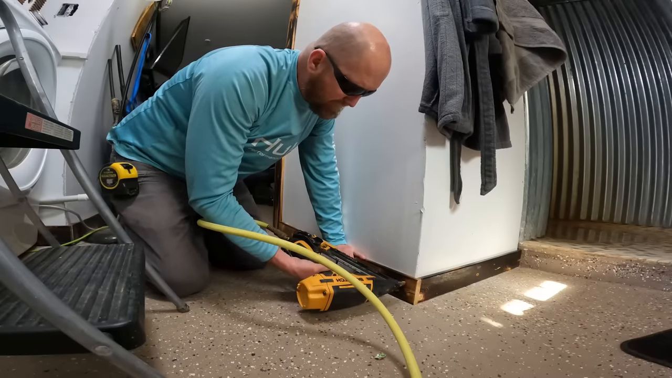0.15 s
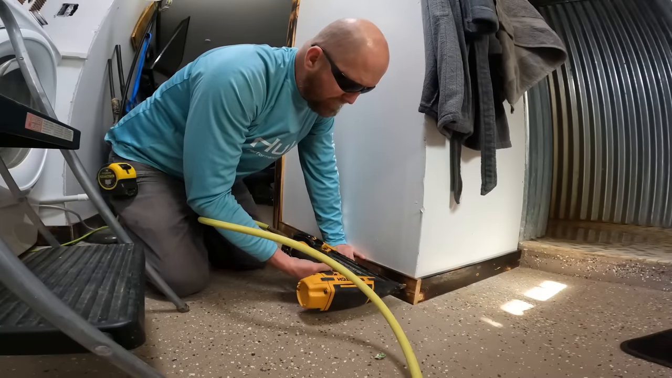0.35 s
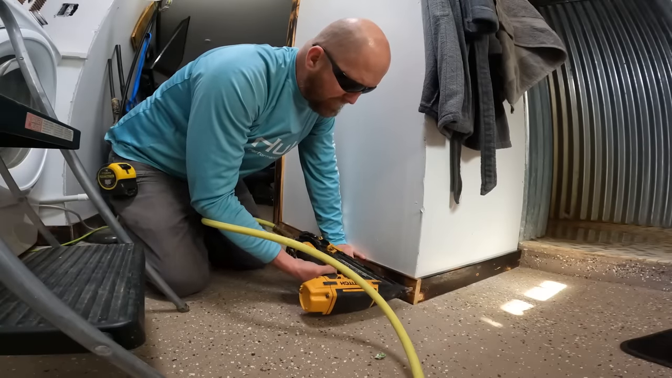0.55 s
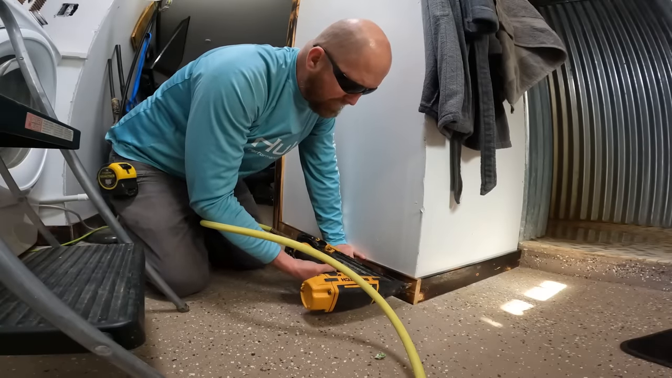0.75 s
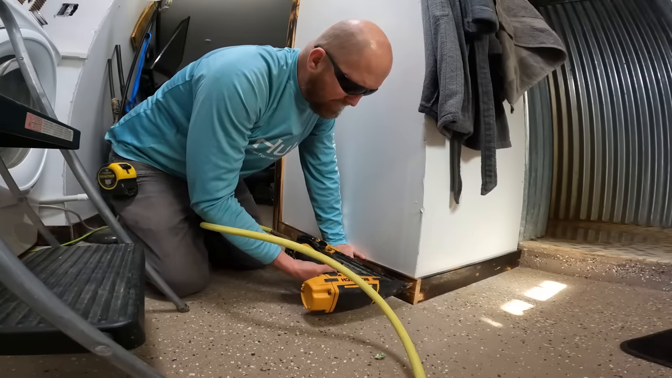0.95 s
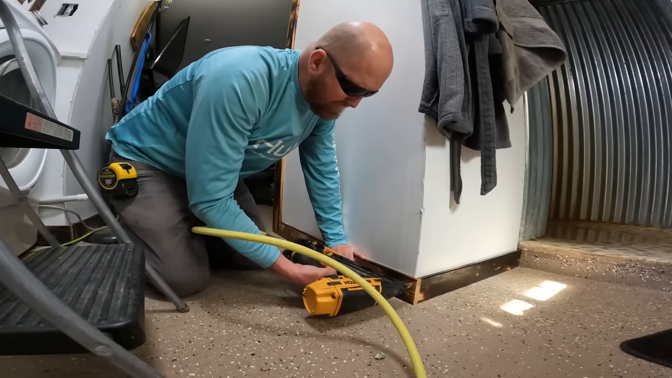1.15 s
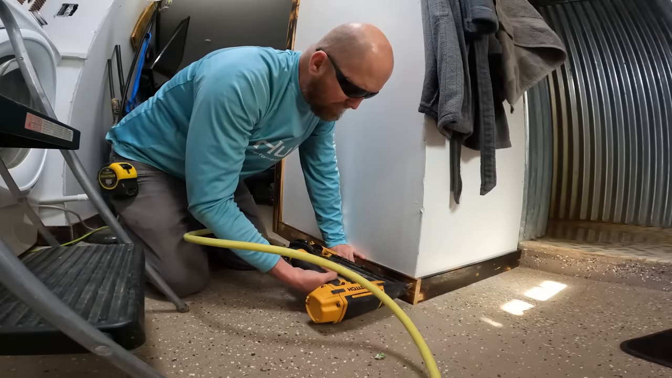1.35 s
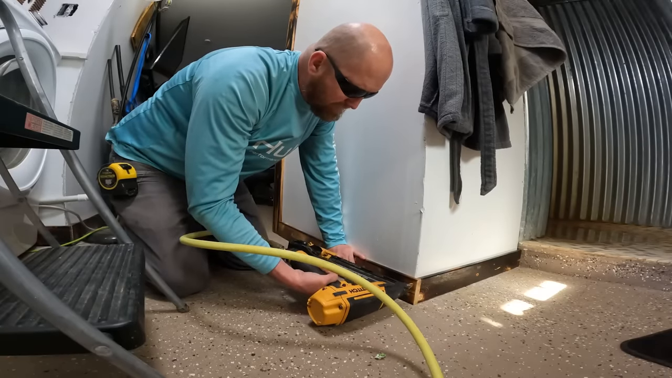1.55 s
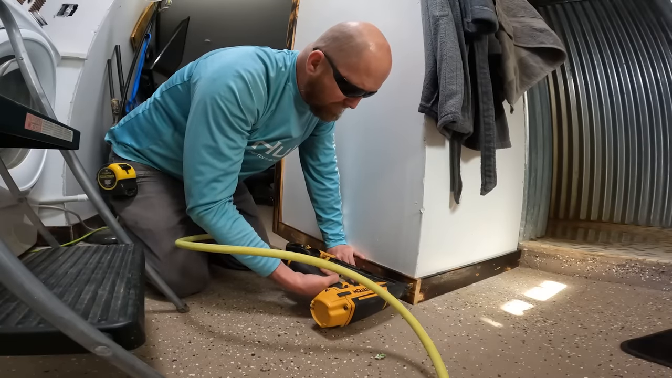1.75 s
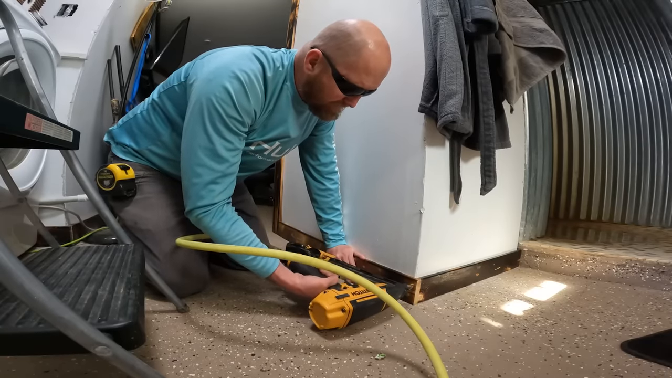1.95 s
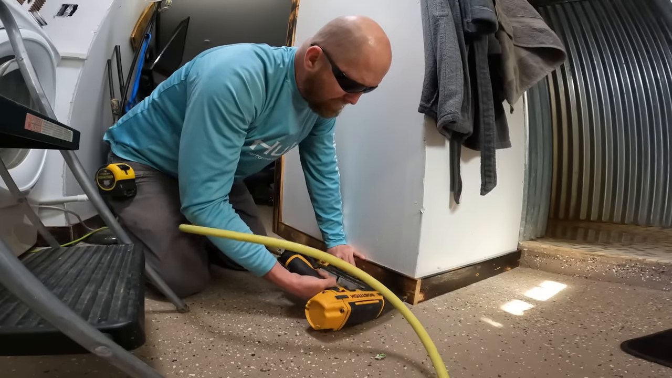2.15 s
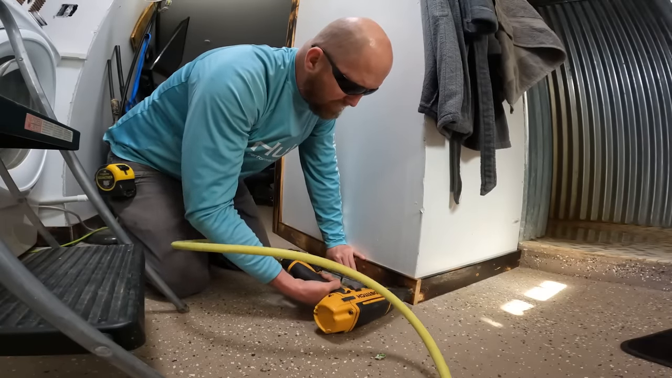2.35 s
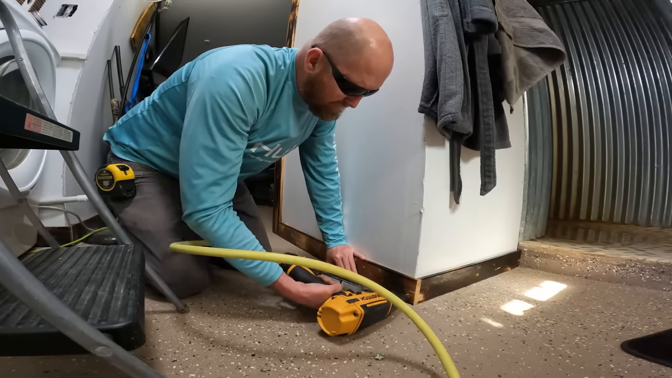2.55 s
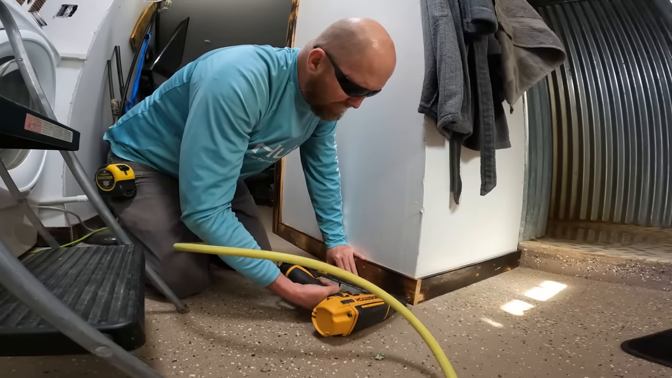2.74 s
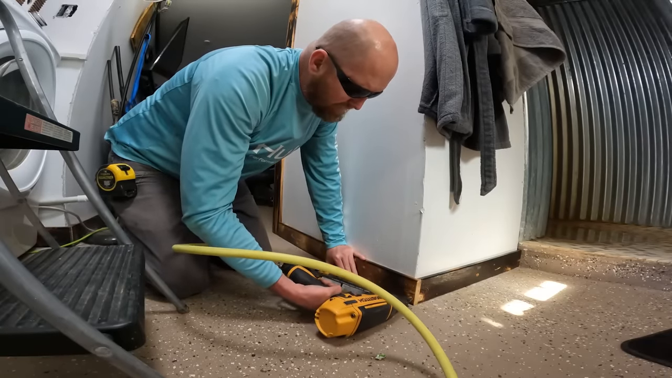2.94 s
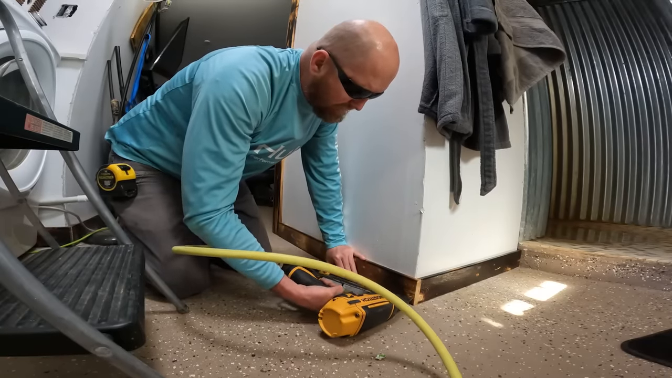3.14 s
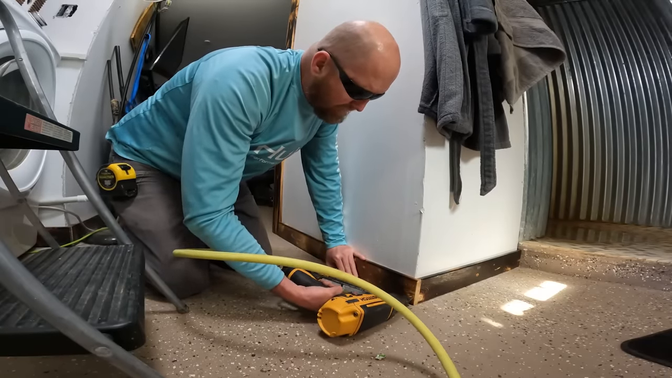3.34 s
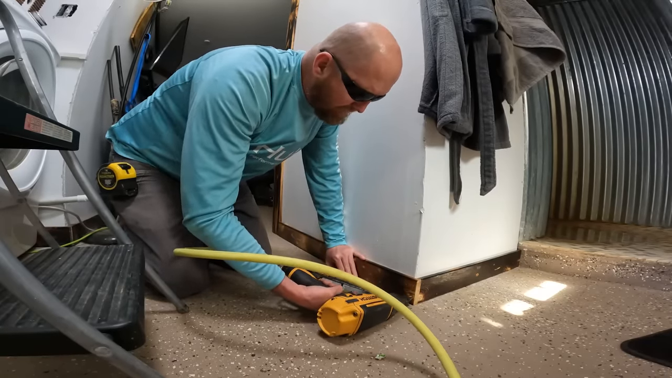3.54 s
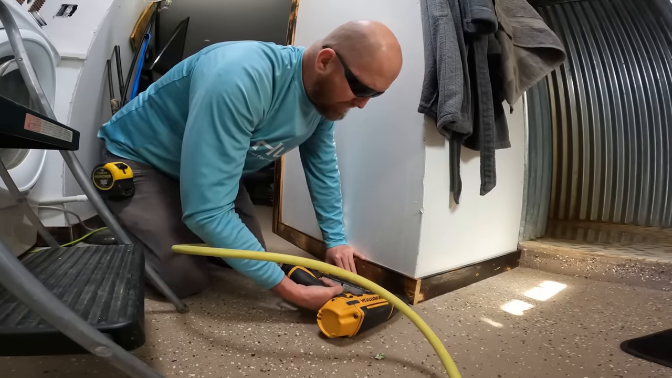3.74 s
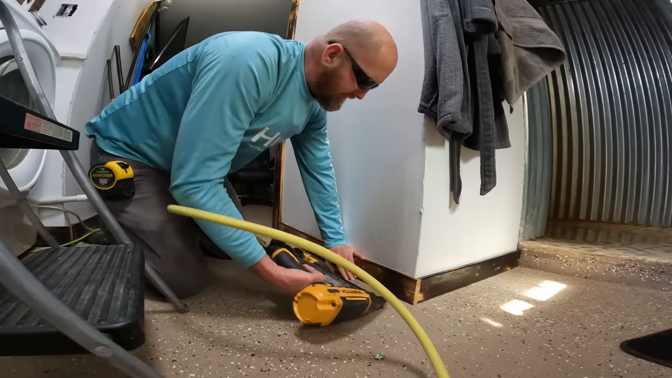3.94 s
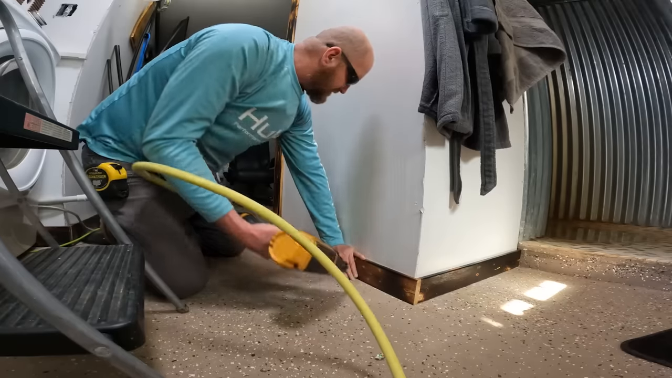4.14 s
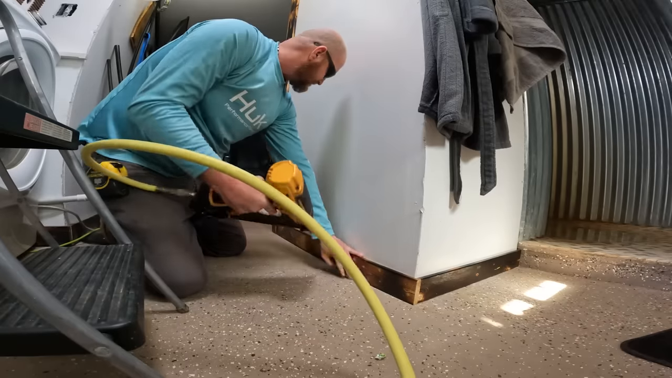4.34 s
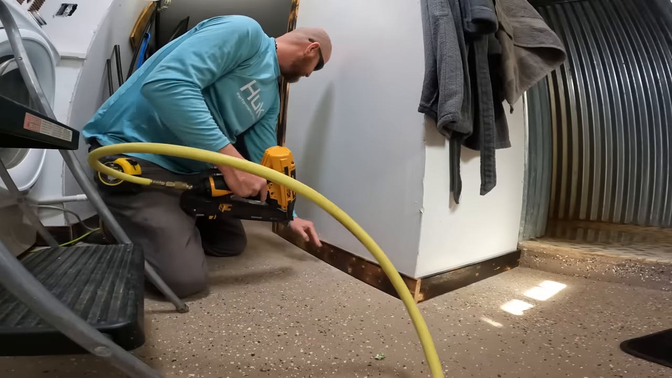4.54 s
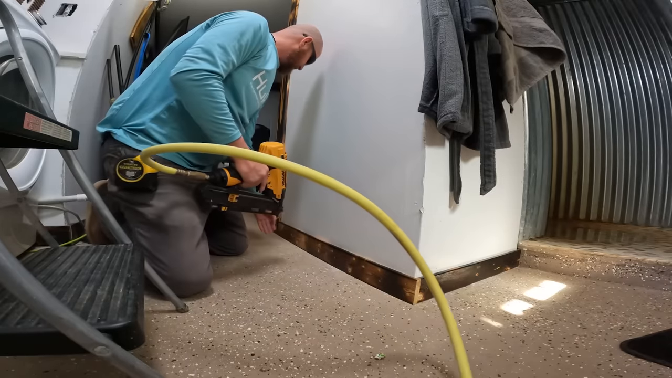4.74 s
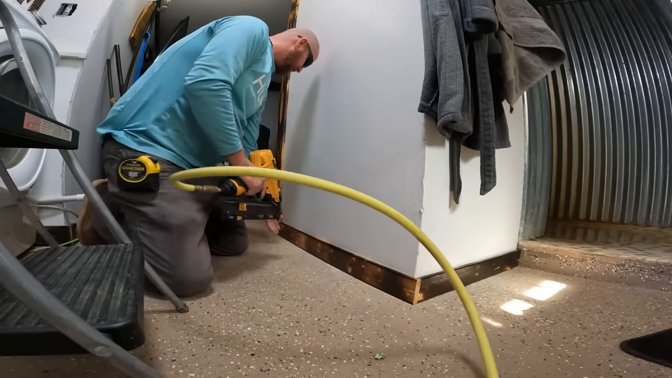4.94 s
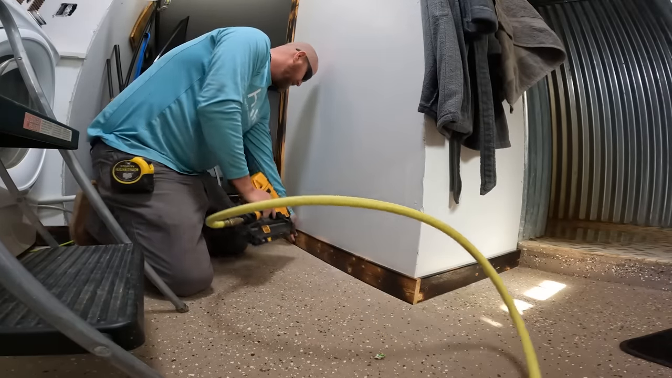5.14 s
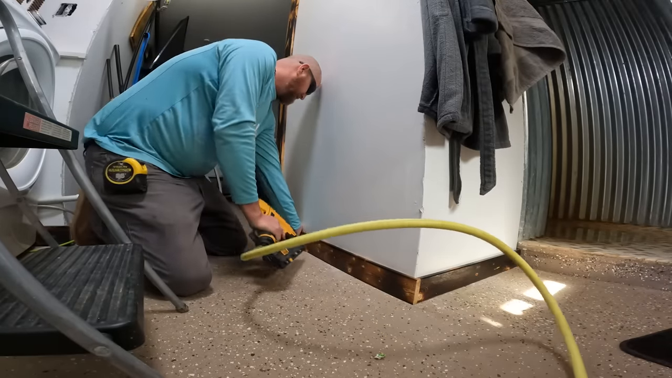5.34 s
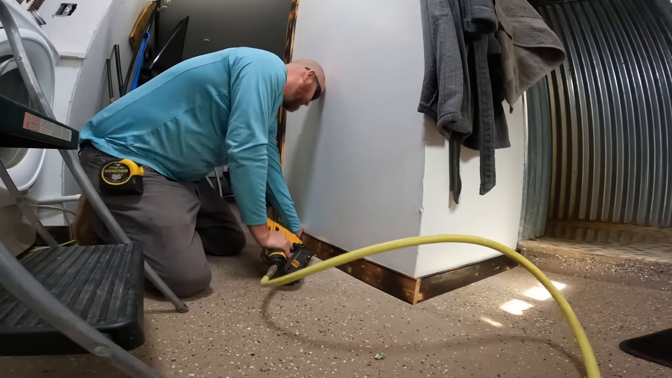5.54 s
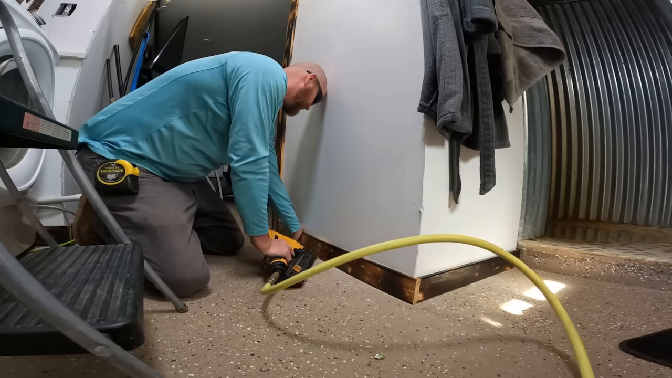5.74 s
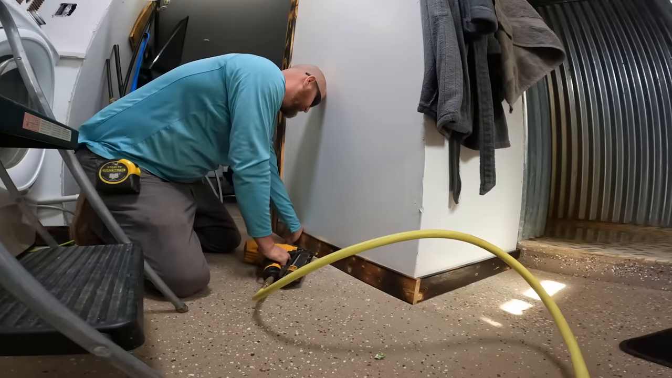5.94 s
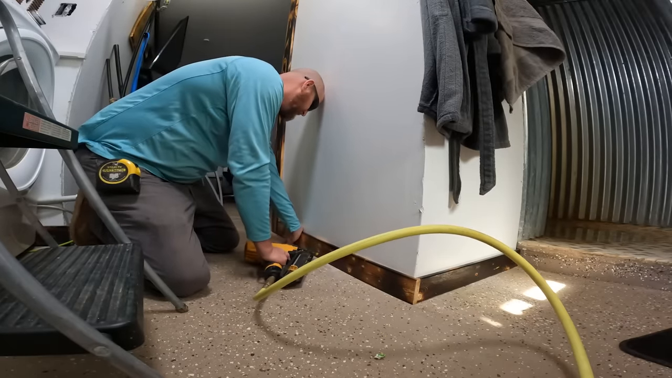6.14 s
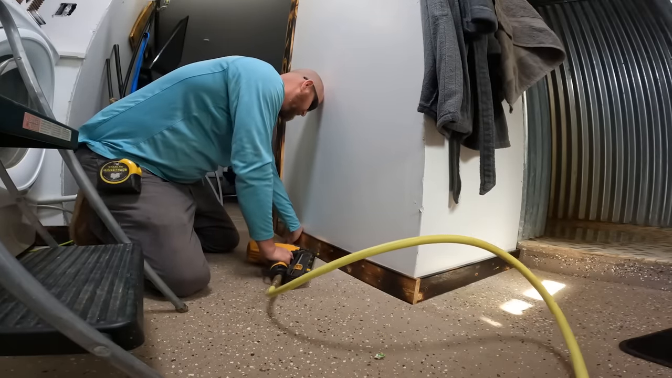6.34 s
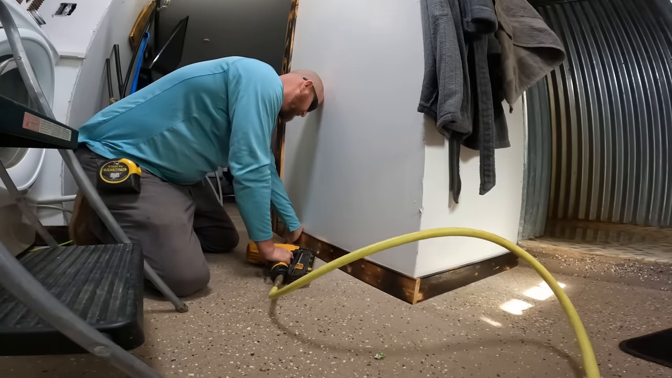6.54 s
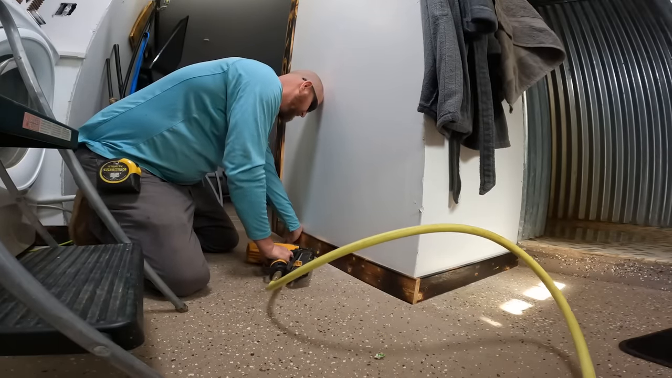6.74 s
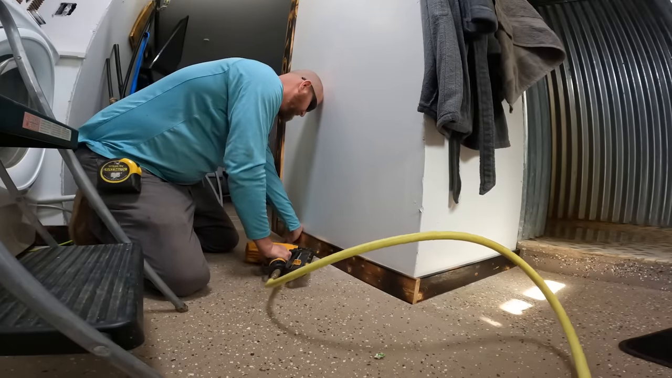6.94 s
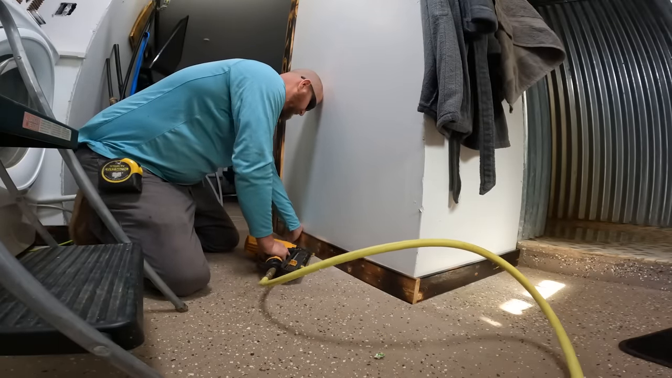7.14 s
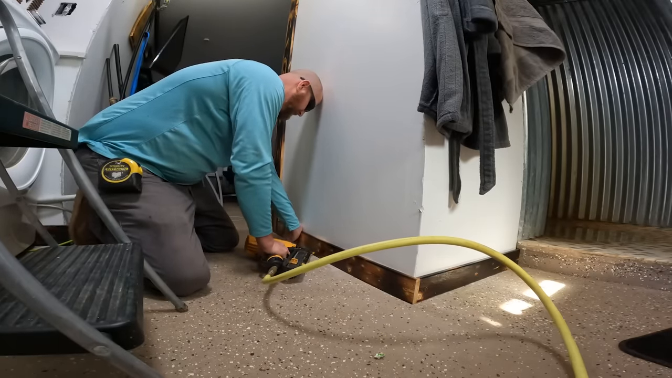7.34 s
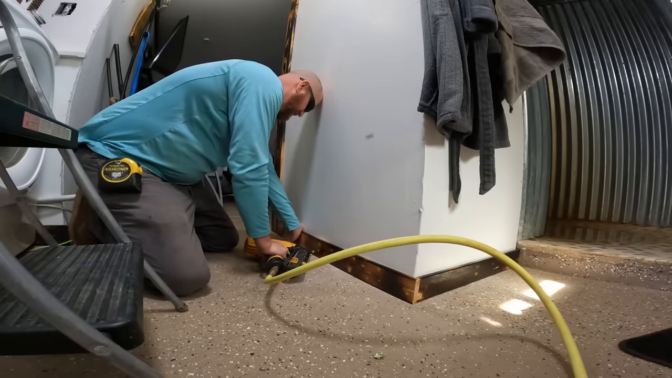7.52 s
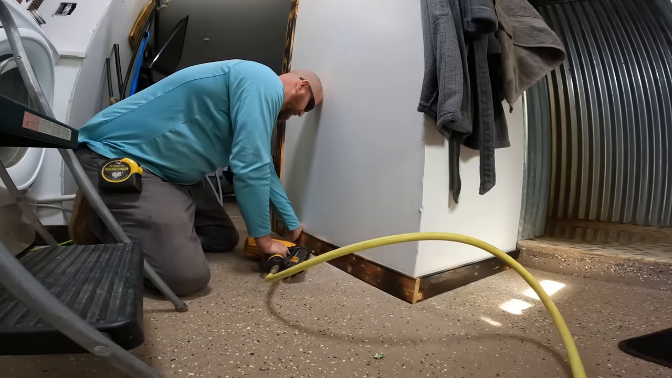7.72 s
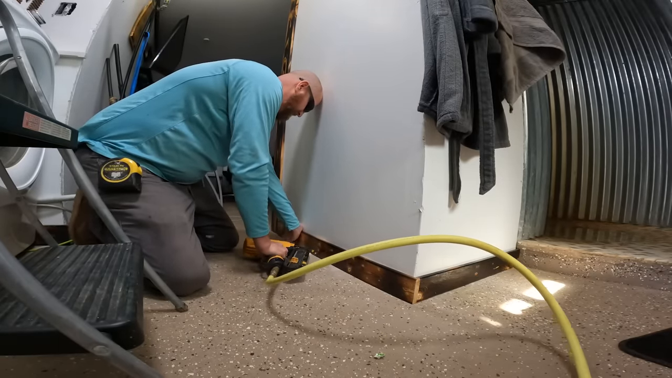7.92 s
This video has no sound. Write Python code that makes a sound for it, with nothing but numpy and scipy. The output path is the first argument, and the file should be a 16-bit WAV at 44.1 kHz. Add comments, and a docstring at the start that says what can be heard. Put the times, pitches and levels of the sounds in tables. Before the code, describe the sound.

A low, throbbing distant engine drone and faint room murmur run throughout, starting subdued. At 0.3 s a pneumatic nailer fires close by: a tiny rushing swell, hard crack and woody bite, then a tenth of a second later a thump and bright hiss of exhaust. A tool clack follows at 0.7. The second shot and puff come at 2.0, with light metallic clacks around 2.4-2.7 and 3.1; the third shot at 3.8. From 4.1 cloth and hose rustle, a dull floor bump lands, and clacks and a hollow knock sound near 4.5. Scuffs continue to a second, deeper thud at 5.6, then rattling clacks at 5.7-6.4. A snappier shot hits at 7.0 with its puff; a final, slightly weaker one at 8.0 is cut off before any exhaust. Short, dense reflections answer the shots; the drone dips after each and creeps back.

```python
"""Nailing a skirting board

A pneumatic nailer drives five nails in a steel-walled room, over the drone of a distant engine (summed sines).
Each shot is shaped noise and ringing tones: a short swell leads into the piston's crack, the nail bites the wood.
After each of the first four, about a tenth of a second later, the exhaust puffs out as a thump and a hiss.
Between shots the tool clacks and knocks, cloth and hose rustle, and there are two dull bumps and a hollow knock.
The recorder's gain sinks under loud sounds, so the drone dips and slowly swells back."""
import sys
import numpy as np
from scipy import signal
from scipy.fft import rfft, irfft, next_fast_len
from scipy.io import wavfile
from scipy.ndimage import uniform_filter1d, minimum_filter1d

SR = 44100
rng = np.random.default_rng(int(sys.argv[2]) if len(sys.argv) > 2 else 0)


def dump_mix(stems):
    """Bounce the given channels to the path in sys.argv[1] as a 16-bit WAV at rate SR."""
    frames = np.atleast_2d(stems).T  # one column per channel
    limited = np.clip(frames, -1, 1)  # hard clip at full scale
    pcm = np.round(limited * 32767).astype(np.int16)
    wavfile.write(sys.argv[1], SR, pcm)


N = 356328
TIME = np.arange(N) / SR  # seconds

# colour of a dull knock: f/Hz, level/dB
DULL_COLOUR = [(100, -24), (350, -2), (550, -7.5), (1300, -3), (2000, -9.5), (6000, -43)]
# colour of a bright tick: f/Hz, level/dB
TICK_COLOUR = [(2000, -19), (4500, 4.5), (7000, -0.5), (8500, -6.5), (12500, -14.5), (15500, -25.5)]


def from_db(db):
    """Turn decibels into a plain multiplier."""
    return 10 ** (np.asarray(db) / 20)


def rms_one(x):
    """Scale a sound so that its average strength (rms) is 1."""
    return x / np.sqrt(np.mean(x ** 2) + 1e-20)


def at_hz(points, hz):
    """Read a table between its points; equal steps are equal frequency ratios, as in hearing."""
    freqs, values = np.transpose(points)
    return np.interp(np.log(hz + 1e-9), np.log(freqs), values)


def noise(spectrum):
    """Steady hiss of rms 1: white noise whose frequencies are raised or lowered by a colour table."""
    size = next_fast_len(N)
    hz = np.arange(size // 2 + 1) * SR / size
    colour = from_db(at_hz(spectrum, hz))
    return rms_one(irfft(rfft(rng.standard_normal(size)) * colour, size)[:N])


def resonant_noise(peaks):
    """Noise sounding a few resonances: it passes twice through each narrow filter."""
    out = 0
    for hz, width, level_db in peaks:
        b, a = signal.iirpeak(hz, hz / width / 2, fs=SR)
        once = signal.lfilter(b, a, rng.standard_normal(N))
        out = out + from_db(level_db) * rms_one(signal.lfilter(b, a, once))
    return out


def wander(per_s):
    """Chance movement: random values of spread 1, so many per second, joined by straight lines."""
    return np.interp(TIME * per_s, np.arange(N), rng.standard_normal(N))


def place(shape, times, levels_db, lead=0.):
    """Add one copy of a shape per event, starting lead seconds early."""
    out = np.zeros(N + 2 * SR + len(shape))  # spare room at both ends
    for s, level_db in zip(times, levels_db):
        start = SR + int(round((s - lead) * SR))
        out[start:start + len(shape)] += from_db(level_db) * shape
    return out[SR:SR + N]


def bursts(times, levels_db, rise, t60, hold=0., ease=1.0):
    """Loudness curves that climb 60 dB in rise seconds, hold, and fall 60 dB in t60 seconds."""
    t = np.arange(-SR // 2, SR // 2) / SR
    climb = np.maximum(-t / rise, 0) ** ease  # ease above 1 rounds the top
    fall = (t - hold) / t60
    shape = np.exp(-np.log(1000) * np.maximum(climb, fall))
    return place(shape, times, levels_db, lead=.5)


def ringing(modes, contact_s=0.00031):
    """A struck object rings in fading tones; the blow takes a moment to press home."""
    t = np.arange(SR // 2) / SR
    rings = 0
    for hz, level_db, t60 in modes:
        fade = np.exp(-np.log(1000) * t / t60)
        rings = rings + from_db(level_db) * np.sin(2 * np.pi * hz * t) * fade
    return rings * (1 - np.exp(-t / contact_s)) ** 2


def tuned_bursts(spectrum, times, levels_db, pitches, rise, t60, q, broad_db, rattle_db):
    """Brief rattling contacts: bits of noise, each coloured by a resonance of its own."""
    t = np.arange(-SR // 8, SR // 4) / SR
    envelope = np.exp(-np.log(1000) * np.maximum(-t / rise, t / t60))
    source, out = noise(spectrum), np.zeros(N)
    for k, (s, level_db, hz) in enumerate(zip(times, levels_db, pitches)):
        broad = source[k * SR // 8:][:len(t)]
        peak = rms_one(signal.lfilter(*signal.iirpeak(hz, q, fs=SR), broad))
        jitter = np.interp(t, np.linspace(t[0], t[-1], 80), rng.standard_normal(80))
        contact = rms_one(peak + from_db(broad_db) * broad) * envelope * from_db(rattle_db * jitter)
        out += place(contact, [s], [level_db], lead=-t[0])
    return out


def flutter(x, round_s=0.0097, loss_db=-2.5, count=9):
    """Low sound bounces between floor and roof: each later copy has a further loss in level."""
    return sum(from_db(k * loss_db) * np.interp(TIME - k * round_s, TIME, x, left=0) for k in range(count))


def room(x, build_up=0.0098, die_off_s=.4, count=9):
    """Dense reflections are fading noise, its bands dying at their own rates; nine stretches differ in pattern."""
    # how long the echo lasts: f/Hz, time to fall 60 dB/s
    echo_times = [(100, 1), (400, 0.82), (1000, 0.61), (2500, 0.55), (5000, 0.57), (8000, 0.49),
                  (13000, .28)]
    t, hz = np.arange(SR) / SR, np.arange(SR // 2 + 1)
    # overlapping bands, one around each frequency of the table
    bands = []
    for own in np.eye(len(echo_times)):
        points = [(row[0], weight) for row, weight in zip(echo_times, own)]
        bands.append(at_hz(points, hz))
    bands = np.array(bands)
    decays = np.exp(-np.log(1000) * t / np.array(echo_times)[:, 1:]) * (1 - np.exp(-t / build_up))
    decays = decays * np.exp(-(t / die_off_s) ** 2)  # the tail falls faster towards its end
    out = np.zeros(N + SR)
    for part in np.array_split(np.arange(N), count):
        tail = np.sum(irfft(rfft(rng.standard_normal(SR)) * bands, SR) * decays, axis=0)
        tail = tail / np.sqrt(np.sum(tail ** 2))
        out[part[0]:part[-1] + SR] += signal.fftconvolve(x[part], tail)
    return out[:N]


def drone(engine_db=-32.5, air_db=-17, throb_db=.5):
    """A distant engine throbs in multiples of its turning speed, over the room's noise murmur."""
    # engine tones: multiple of the turning speed, level/dB
    orders = [(1, -5), (2, 0), (3, -18), (4, -9), (5, -12), (6, -3.5), (7, -15), (8, -18), (9, -28),
              (10, -16.5), (11, -32), (12, -33), (13, -37), (15, -38), (17, -41)]
    # colour of the room's murmur: f/Hz, level/dB
    air_colour = [(25, -6.5), (130, -3), (220, -5), (320, -21.5), (450, -25.5), (650, -39), (850, -27),
                  (1200, -29.5), (1620, -28), (2100, -39), (3200, -44.5), (5000, -61), (8000, -72.5),
                  (15000, -71)]
    turns_per_s, speed_wander = 22.15, .004  # the wander is a share of the speed
    angle = 2 * np.pi * np.cumsum(turns_per_s * (1 + speed_wander * wander(1))) / SR
    # the way through the walls scatters the timing of the tones
    phases = rng.normal(0, 1.1, len(orders))
    throb = sum(from_db(db) * np.cos(round(k) * angle + p) for (k, db), p in zip(orders, phases))
    return from_db(engine_db) * (from_db(throb_db) * rms_one(throb) + from_db(air_db) * noise(air_colour))


def clacks(bounce_s=.024, bounce_db=-5.5, body_hz=480, pitch_spread=.2):
    """The tool's parts clack with a metal ring, a bright tick and a dull body; a loose part bounces once."""
    # sharp clacks: t/s, level/dB, tick relative to the clack/dB, ring f/Hz
    events = [(.159, -49, -12.5, 2580), (.715, -28.5, -14, 2180), (1.376, -49, -19, 1680),
              (2.443, -32, -8.5, 2360), (2.566, -37.5, -10, 2250), (2.668, -39, -10, 2350),
              (3.134, -38.5, -7, 2430), (4.385, -30, -26, 2270), (4.479, -35.5, -33, 2360),
              (4.959, -47, -24, 1860), (5.011, -62.5, 7.5, 4500), (5.114, -53.5, -5.5, 4400),
              (5.742, -35, -7.5, 3280), (5.785, -27, -7, 2700), (5.879, -53.5, 10.5, 3000),
              (5.939, -38.5, -10, 1540), (6.06, -42, -12, 2100), (6.105, -44.5, -6, 2100),
              (6.33, -28.5, -13, 2500)]
    # colour of the metal ring: f/Hz, level/dB
    metal_colour = [(600, -20.5), (1500, -2), (2500, 1), (4000, 0), (6000, -16), (12000, -42.5)]
    first = np.array(events)
    # one random factor sets both the delay and the loss of each bounce
    bounces = first + np.outer(rng.uniform(.5, 1.3, len(first)), [bounce_s, bounce_db, 0, 0])
    s, level_db, tick_db, ring_hz = np.vstack([first, bounces]).T
    body_pitches = body_hz * np.exp(pitch_spread * rng.standard_normal(len(s)))
    metal = tuned_bursts(metal_colour, s + .001, level_db, ring_hz,
                         rise=.016, t60=.1, q=3.5, broad_db=-6, rattle_db=3)
    body = tuned_bursts(DULL_COLOUR, s + .002, level_db, body_pitches,
                        rise=.022, t60=.11, q=3, broad_db=6, rattle_db=3)
    tick = noise(TICK_COLOUR) * bursts(s, level_db + tick_db, rise=.022, t60=.09, hold=.003)
    return from_db(-3.5) * metal + from_db(-7) * body + from_db(-3) * tick


def shots(drive_s=0.0088, bite_s=.012, treble_hz=4500, move_s=5):
    """A short noise swell leads into the piston's crack, and the nail sets the board ringing."""
    # shots: t/s, blow level/dB, swell level/dB
    events = [(.268, -0.5, 1.5), (1.999, -1.5, 3), (3.759, -1.5, 1.5), (6.980, 0.5, 3.5), (7.981, -5, -11)]
    # the tool's two places along the board, all level/dB:
    # whistle in the swell, sharp snap, board thump, wall panel, treble, room
    places = [(-5, -8, -0.5, -17, 1.5, 0.5), (-0.5, 7.5, -5, 1, -2.5, -2)]
    # colours of the noises: f/Hz, level/dB
    swell_colour = [(150, -17.5), (400, -5), (700, -7), (900, -7), (1400, -3.5), (2300, -3), (2850, 0),
                    (3400, -5.5), (5000, -12.5), (7200, -12.5), (8600, -22.5), (10500, -24), (15500, -36)]
    crack_colour = [(200, -8.5), (500, 8), (900, -8), (2000, 4.5), (3000, -4), (5000, -12.5), (7200, -21),
                    (8500, -22.5), (12500, -25.5), (15500, -39)]
    snap_colour = [(300, -9), (900, -4), (1700, 0), (2500, 1), (3500, -16), (7000, -23), (15000, -44.5)]
    bite_colour = [(200, -6.5), (480, -3.5), (630, -5), (850, 5.5), (1150, -2), (1750, 3.5), (2800, -11),
                   (4000, -17.5), (7000, -21), (8500, -33.5), (12500, -27), (15500, -46.5)]
    # whistling resonances in the swell before the crack: f/Hz, filter width setting/Hz, level/dB
    whistle_peaks = [(1310, 350, -3.5), (2750, 400, -3.5), (3930, 400, -9), (7140, 300, -19.5),
                     (9700, 700, -19.5)]
    # ringing tones of piston, board and wall panel: f/Hz, level/dB, time to fall 60 dB/s
    piston_tones = [(140, -9, 0.039)]
    board_thump_tones = [(207, -7.5, 0.087), (159.8, -25, 0.74), (219.5, -22, 0.65)]
    board_tones = [(851, -26, 0.15), (1255, -24.5, 0.036), (1377, -23.5, 0.15), (1660, -24, 0.034),
                   (1680, -21.5, 0.027), (2200, -26.5, 0.022)]
    panel_tones = [(489, -19.5, 0.12)]

    s, blow_db, swell_db = np.transpose(events)
    place_rows = np.array(places)[(s > move_s).astype(int)]
    whistle_db, snap_db, thump_db, panel_db, treble_db, room_db = place_rows.T
    swell = from_db(-25.0) * noise(swell_colour) * bursts(s - .003, swell_db, rise=.04, t60=0.09, ease=1.3)
    whistle_curve = bursts(s - .006, whistle_db, rise=.05, t60=.04, hold=.005, ease=1.1)
    swell += from_db(-27.5) * resonant_noise(whistle_peaks) * whistle_curve
    crack = from_db(-17.5) * noise(crack_colour) * bursts(s, blow_db, rise=0.0033, t60=0.033, hold=0.0021)
    snap_curve = bursts(s + 0.00028, snap_db, rise=0.0018, t60=0.0058, hold=0.00092)
    snap = from_db(-18.5) * noise(snap_colour) * snap_curve
    # the nail's head seats with a second snap
    seat_curve = bursts(s + .0135, blow_db, rise=0.0015, t60=.01, hold=0.0018)
    snap += from_db(-19) * noise(snap_colour) * seat_curve
    bite = from_db(-14.5) * noise(bite_colour) * bursts(s + bite_s, blow_db, rise=0.044, t60=0.05, hold=0.0014)
    # the board rings a little differently at every nail
    board = 0
    for tone in board_tones:
        board = board + place(ringing([tone]), s + bite_s, blow_db + rng.normal(0, 3.2, len(s)))
    panel = place(ringing(panel_tones), s + drive_s, blow_db + panel_db)
    thump = flutter(place(ringing(piston_tones), s, blow_db))
    thump += place(ringing(board_thump_tones), s + drive_s, blow_db + thump_db)
    strike = crack + snap + bite + panel
    # room and treble levels glide from shot to shot
    send = np.interp(TIME, s, from_db(room_db))
    into_room = from_db(-1.5) * swell + from_db(-8.0) * strike + from_db(-18.5) * thump
    heard = swell + strike + board + thump + room(send * into_room)
    treble = signal.sosfiltfilt(signal.butter(2, treble_hz, "high", fs=SR, output="sos"), heard)
    return heard + (np.interp(TIME, s, from_db(treble_db)) - 1) * treble


def exhaust():
    """The valve knocks open and the spent air leaves as a low ringing puff and a noise hiss."""
    # puffs as the trigger is let go: t/s, level/dB
    puffs = [(0.367, 4.5), (2.105, 5), (3.851, 5), (7.093, 6)]
    # colour of the hiss: f/Hz, level/dB
    hiss_colour = [(200, -8), (400, -10), (600, -11), (860, 0), (1350, -5.5), (2000, 2.5), (3000, 4.5),
                   (5000, -0.5), (7100, -3.5), (8000, -10.5), (11300, -12), (12400, -11), (13500, -18.5),
                   (15500, -25)]
    # tone of the low puff: f/Hz, level/dB, time to fall 60 dB/s
    puff_tones = [(125, -7.5, 0.028)]
    s, level_db = np.transpose(puffs)
    blast = bursts(s, level_db, rise=.028, t60=.16, hold=.015, ease=1.15)
    hiss = from_db(-24.5) * noise(hiss_colour) * blast
    knock_curve = bursts(s - .001, level_db, rise=0.0024, t60=0.023, hold=0.0019)
    knock = from_db(-21.0) * noise(DULL_COLOUR) * knock_curve
    thump = place(ringing(puff_tones, contact_s=0.00011), s, level_db)
    thump = flutter(thump, round_s=.0108, loss_db=-5.0)
    into_room = from_db(-7) * hiss + from_db(-10) * knock + from_db(-19.5) * thump
    return hiss + knock + thump + room(into_room)


def knocks():
    """The tool meets wood or floor: a hollow knock of resonant noise with a faint tick."""
    # dull knocks: t/s, level/dB, f/Hz
    events = [(0.744, -42.5, 414), (4.478, -33, 930), (5.784, -33, 600), (5.805, -37, 595),
              (5.966, -43.5, 1050), (6.355, -36.5, 523), (6.68, -57, 602), (7.845, -42, 350)]
    s, level_db, pitches = np.transpose(events)
    body = tuned_bursts(DULL_COLOUR, s + .002, level_db, pitches,
                        rise=.022, t60=.14, q=5, broad_db=0, rattle_db=3)
    tick = noise(TICK_COLOUR) * bursts(s, level_db, rise=.018, t60=.12, hold=.003)
    return from_db(1.5) * body + from_db(-19.5) * tick


def handling():
    """The tool is handled with clacks and knocks, and the room's reflections answer."""
    contacts = clacks() + knocks()
    return contacts + room(from_db(-10.5) * contacts)


def rustle(rise_s=0.21, fade_s=1.4):
    """Cloth and hose slide in uneven noise and scuffs; shifting weight rumbles in the floor."""
    # the kneeling body moves: t/s, length/s, rustle level/dB, floor rumble level/dB
    moves = [(1.01, 0.63, -82.5, -41.5), (3.45, 0.24, -67, -48), (4.114, 0.45, -55, -31),
             (4.803, 0.97, -57, -39.5), (5.956, 0.71, -66, -45.5)]
    # scuffs of cloth and hose: t/s, level/dB, centre f/Hz
    scuff_events = [(1.909, -62, 2200), (2.851, -55, 2300), (4.12, -37, 1410), (4.849, -62, 4450),
                    (5.14, -53, 1820), (5.39, -57, 4030), (6.441, -68, 2140), (6.586, -58, 2210),
                    (6.939, -57, 2300)]
    # colours of cloth and of floor rumble: f/Hz, level/dB
    cloth_colour = [(100, -1), (500, 4.5), (1800, -2), (3500, -5.5), (7000, -15), (8500, -20.5),
                    (12500, -26.5), (15500, -46.5)]
    rumble_colour = [(22, -3.5), (35, 2), (65, -3), (110, -7.5), (200, -17.5), (400, -38.5), (3000, -90.5)]
    sliding, weight = 0, 0
    for s, length, rustle_db, rumble_db in moves:
        away = np.maximum((s - TIME) / rise_s, (TIME - s - length) / fade_s)
        move = from_db(-60 * np.maximum(away, 0))
        sliding = sliding + from_db(rustle_db) * move
        weight = weight + from_db(rumble_db) * move
    strokes, slips = wander(14), wander(160)  # slow and quick unevenness
    cloth = noise(cloth_colour) * sliding * from_db(-3.0 + 2 * strokes + 2 * slips)
    scuffs = tuned_bursts(cloth_colour, *np.transpose(scuff_events),
                          rise=0.089, t60=0.064, q=5.9, broad_db=-3, rattle_db=2.5)
    return cloth + scuffs + room(from_db(-4.0) * scuffs) + noise(rumble_colour) * weight


def bumps(overtone=1.734):
    """Soft weight thuds on the floor in two low tones and noise; something hollow is knocked and rings on."""
    # dull bumps: t/s, level/dB, f/Hz, knock level/dB
    events = [(4.161, -9, 104.8, -16), (5.566, -9.5, 74.5, -51)]
    # colour of the floor knock: f/Hz, level/dB
    floor_colour = [(60, 0), (150, 11), (220, -2), (430, -9.5), (600, -43), (2000, -41), (6000, -76)]
    # hollow knock: t/s, level/dB
    hollow_events = [(4.478, -38)]
    # its ringing tones: f/Hz, level/dB, time to fall 60 dB/s
    hollow_tones = [(448, -2, 0.27), (685, -12, 0.2), (880, -6, .2), (913, 1, 0.32), (960, -6, .2)]
    s, level_db, pitches, knock_db = np.transpose(events)
    thuds = np.zeros(N)
    for at, db, hz in zip(s, level_db, pitches):
        tones = [(hz, 0, .2), (hz * overtone, -6, .12)]
        thuds += place(ringing(tones, contact_s=0.0031), [at], [db])
    thuds += noise(floor_colour) * bursts(s + 0.00067, knock_db, rise=0.012, t60=0.12, hold=0.0048)
    hollow = place(ringing(hollow_tones), *np.transpose(hollow_events))
    return thuds + hollow + room(from_db(-14) * thuds + from_db(-5.5) * hollow)


def gain_control(x, window_s=0.048, attack_s=0.0024):
    """A loud sound quickly turns the gain down; it stays down for a moment, then creeps back."""
    threshold_db, deepest_cut_db, start_cut_db = -16, 9.5, 9.5
    hold_s, recovery_db_per_s = 0.43, 5
    power = uniform_filter1d(np.mean(x, axis=0) ** 2, int(window_s * SR))
    level_db = 10 * np.log10(np.abs(power) + 1e-12)
    cut_db = np.clip(level_db - threshold_db, 0, deepest_cut_db)
    cut_db[0] = start_cut_db  # the scene opens with the gain turned down
    # hold the deepest cut of the last moment
    half = int(hold_s * SR / 2)
    held = -minimum_filter1d(-cut_db, 2 * half + 1, origin=half, mode="nearest")
    # let the cut shrink no faster than the recovery allows
    slope = recovery_db_per_s * TIME
    released = np.maximum.accumulate(held + slope) - slope
    r = np.exp(-1 / (attack_s * SR))
    smooth_cut_db = signal.lfilter([1 - r], [1, -r], released, zi=[r * start_cut_db])[0]
    return x * from_db(-smooth_cut_db)


def scene(nailer_db=9.5):
    """Mix mostly in the middle; the top treble spreads and leans left, with a faint late trace of the rest."""
    nailer = from_db(nailer_db) * (shots() + exhaust())
    near = nailer + handling() + bumps() + rustle()
    top = signal.sosfiltfilt(signal.butter(5, 10300, "high", fs=SR, output="sos"), near)
    # side reflections arrive a few milliseconds late
    late = np.roll(from_db(-4.5) * top + from_db(-53) * near, int(.006 * SR))
    side = from_db(-14.5) * top + late
    return near + drone() + np.array([side, -side])


def record(dry, cutoff_hz=15500, ceiling=.8):
    """Cut the deepest bass, duck under loud sounds, round peaks towards the ceiling, and cut the top."""
    dry = signal.sosfilt(signal.butter(1, 12, "high", fs=SR, output="sos"), dry)
    rounded = ceiling * np.tanh(gain_control(dry) / ceiling)  # ceiling is a share of full scale
    steep = signal.ellip(10, .2, 80, cutoff_hz, fs=SR, output="sos")
    return signal.sosfilt(steep, rounded)


dry = scene()
out = record(dry)
dump_mix(out)
```